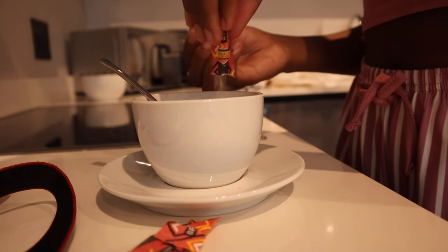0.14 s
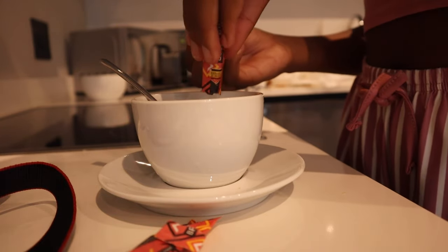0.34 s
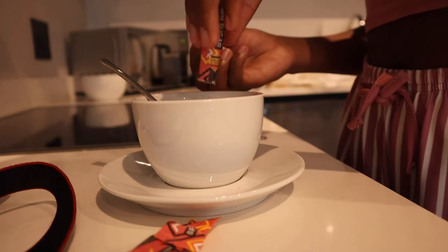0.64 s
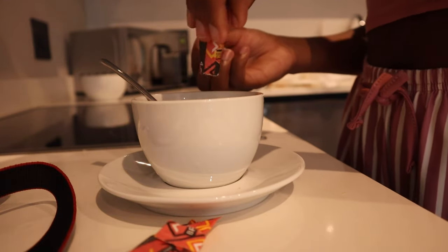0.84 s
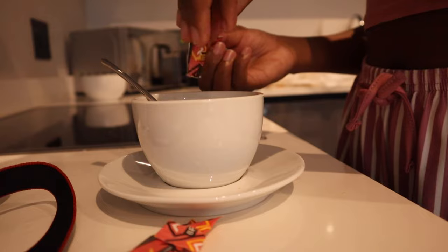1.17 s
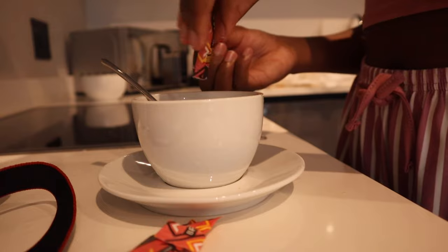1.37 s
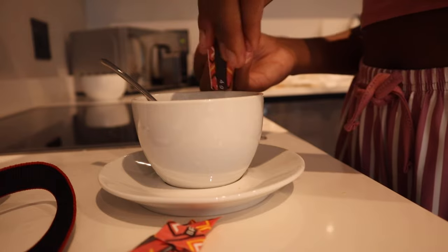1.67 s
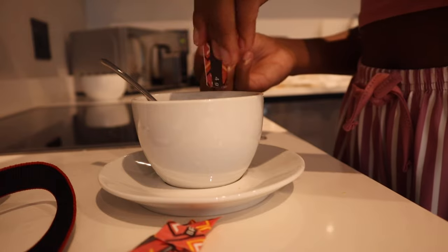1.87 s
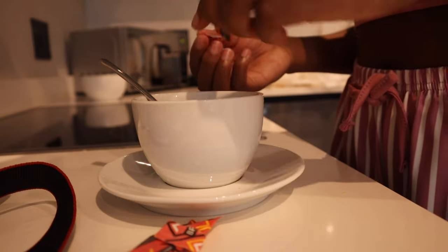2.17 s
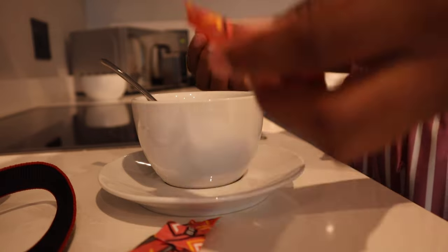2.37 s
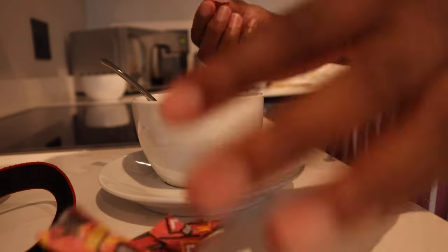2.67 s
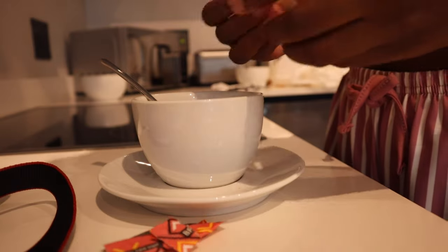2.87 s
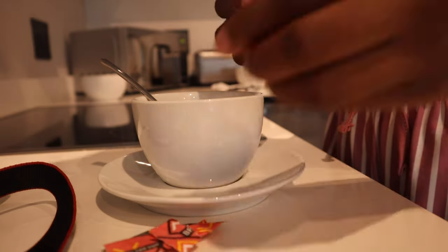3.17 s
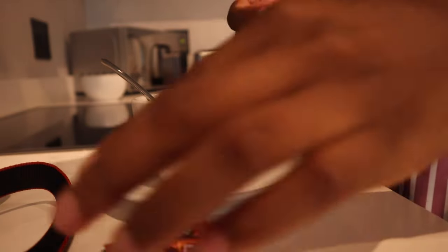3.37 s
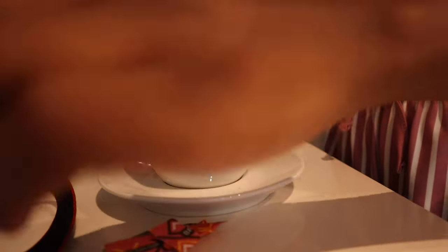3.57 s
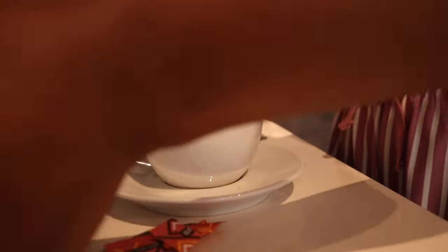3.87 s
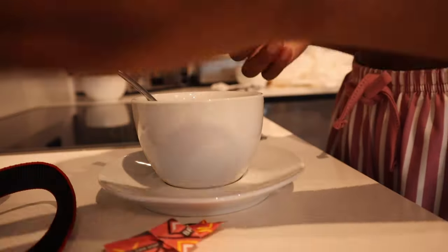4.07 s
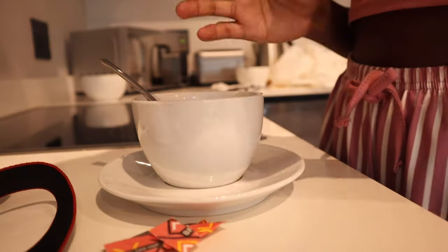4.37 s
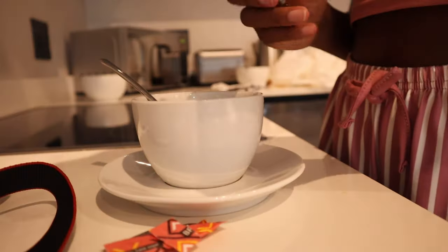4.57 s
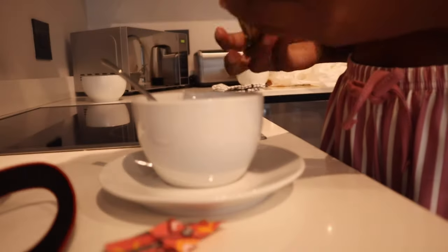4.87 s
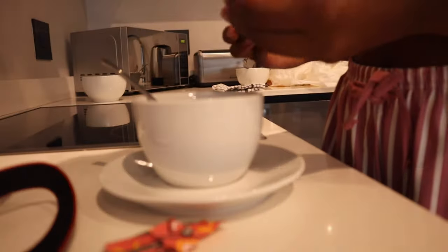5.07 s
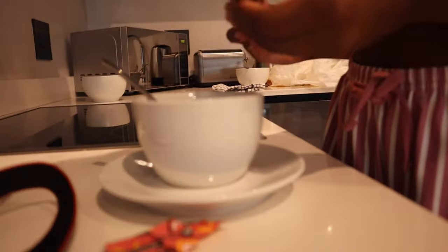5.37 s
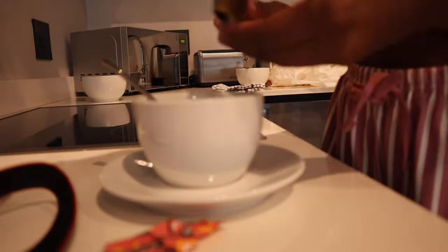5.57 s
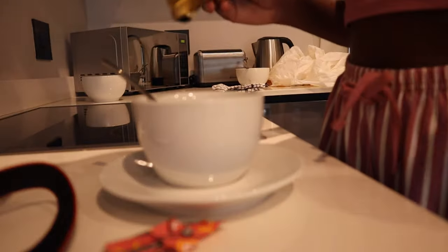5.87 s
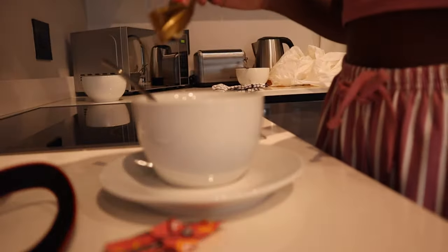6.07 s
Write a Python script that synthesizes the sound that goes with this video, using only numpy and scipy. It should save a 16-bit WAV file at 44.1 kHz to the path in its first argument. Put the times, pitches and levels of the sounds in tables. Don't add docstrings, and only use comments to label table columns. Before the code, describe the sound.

Very close stereo microphone in a small hard kitchen. Fingers squeeze a little plastic sachet over a ceramic cup with bright snaps and hissing powder; it is put down with soft knocks. A quieter reach follows, then another wrapper crackles, tears in a dense burst and crumples, leaving faint appliance hum and low rumble.

```python
import sys
import numpy as np
from scipy import signal
from scipy.io import wavfile
from scipy.ndimage import uniform_filter1d

SR = 44100
rng = np.random.default_rng(int(sys.argv[2]) if len(sys.argv) > 2 else 0)


def natural_amplitude(level_db):
    exponent = np.asarray(level_db, float) / 20
    return 10 ** exponent


def unload_wav(signal):
    wavfile.write(
        sys.argv[1],
        SR,
        np.round(np.clip(np.atleast_2d(signal).T, -1, 1) * 32767).astype(np.int16),
    )


N = 274737

# start_s, left_lag (samples by which the left side hears later), left_minus_right_db
HANDS = [
    (0, 2.5, -5),
    (.6, -1, -2.5),
    (2.9, -2, 0),
    (3.2, 6.5, 1.5),
    (4.2, 6, 3),
    (4.35, 0, 0.7),
    (5.0, 2.5, -2),
    (5.3, -2.5, -0.5),
    (6.23, 3.5, -6),
]


def rms_one(x):
    return x / np.sqrt(np.mean(x ** 2) + 1e-20)


def at_hz(points, hz):
    table_hz, value = np.transpose(points)
    return np.interp(np.log(hz), np.log(table_hz), value)


def band(x, low_hz, high_hz):
    sos = signal.butter(2, [low_hz, min(high_hz, .45 * SR)], "band", fs=SR, output="sos")
    return signal.sosfilt(sos, x + 1e-18)


def resonance(x, hz, width_hz):
    r = np.exp(-np.pi * width_hz / SR)
    feed = np.array([1, 0, -1]) * (1 - r * r) / 2
    return signal.lfilter(feed, [1, -2 * r * np.cos(2 * np.pi * hz / SR), r * r], x + 1e-18)


def drift(rate):
    knots = rng.standard_normal(2000)
    return np.interp(np.arange(N) * 2 * rate / SR, np.arange(2000), knots)


def coloured(mid, side, spectrum, patchy_db, skip=0):
    # pitch_hz, left_right_likeness (1 same, -1 opposite)
    likeness = [(30, 1), (80, 0.94), (160, 0.91), (320, 0.34), (700, -0.2), (2000, -0.62), (12000, -0.52)]
    out = 0
    edges = 22 * 2 ** np.arange(0, 10, .5)
    for k, (low, high) in enumerate(zip(edges, edges[1:])):
        hz = np.sqrt(low * high)
        alike = np.clip(at_hz(likeness, hz), -1, 1)
        gain = natural_amplitude(at_hz(spectrum, hz) + patchy_db * drift(11))
        if k < skip:
            continue
        m, s = band(np.array([mid[k % 2], side[k % 2]]), low, high)
        out = out + gain * (np.sqrt(1 + alike) * m + np.sqrt(1 - alike) * s * [[1], [-1]])
    return rms_one(out)


def hand_pan_db(at_s):
    start_s, _, pan_db = np.transpose(HANDS)
    return np.interp(at_s, start_s, pan_db)


def place(at_s, shapes):
    out = np.zeros((2, N + 8000))
    start_s, left_lag, _ = np.transpose(HANDS)
    lag = np.interp(at_s, start_s, left_lag)
    for s, late, shape in zip(at_s, lag, shapes):
        for ear, shift in enumerate((late / 2, -late / 2)):
            start = int(round(s * SR + shift))
            out[ear, start:start + shape.shape[1]] += shape[ear]
    return out[:, :N]


def background():
    # pitch_hz, width_hz, level_db
    hum_peaks = [(120.5, 13, -54.5), (169.1, 9.2, -60)]
    # pitch_hz, level_db (per Hz)
    air_colour = [(20, -0.5), (32, -18.5), (55, -3.5), (91, -8.5), (147, -5), (300, -9.5), (800, -16),
                  (1400, -18), (4850, -29.5), (8000, -52.5), (10500, -39.5), (14000, -40)]
    white = rng.standard_normal((5, N))
    hum = sum(natural_amplitude(db) * rms_one(resonance(resonance(white[4], f, w), f, w)) for f, w, db in hum_peaks)
    motor_hz, wander_hz, motor_db = 39.5, 1.2, -49.5
    turns = np.cumsum(motor_hz + wander_hz * drift(1.295)) / SR
    motor = natural_amplitude(motor_db + 1.9 * drift(2.4)) * np.sin(2 * np.pi * turns)
    air = natural_amplitude(-45.5) * coloured(white[:2], white[2:4], air_colour, patchy_db=-0.5)
    return air + hum + motor


def scattered(length, spread):
    x = np.eye(1, length)[0]
    for lag in rng.integers(9, 70, 3):
        b = np.zeros(lag + 1)
        b[0], b[-1] = -spread, 1
        x = signal.lfilter(b, b[::-1], x)
    return x


def kitchen(x, tail_db):
    # pitch_hz, fade_s
    room_fade = [(400, 0.53), (1500, 0.55), (4000, 0.46), (8000, 0.43), (14000, 0.39)]
    # delay_s, left_db, right_db
    surfaces = [(.0013, -4, -8), (.0024, -16.5, -24), (.0045, -17, -22.5), (.0070, -9, -19),
                (0.01, -18.5, -11.5), (0.013, -14.5, -16), (0.018, -17.5, -22.5)]
    t = np.arange(SR // 2) / SR
    white = rng.standard_normal((2, len(t)))
    edges = 250 * 2. ** np.arange(7)
    tail = 0
    for low, high in zip(edges, edges[1:]):
        fade_s = at_hz(room_fade, np.sqrt(low * high))
        tail = tail + band(white, low, high) * natural_amplitude(-60 * t / fade_s)
    response = natural_amplitude(tail_db) * tail * (1 - np.exp(-t / 0.0075))
    for delay_s, *ears_db in surfaces:
        start = int(delay_s * SR)
        for ear, db in enumerate(ears_db):
            response[ear, start:start + 800] += natural_amplitude(db) * scattered(length=800, spread=0.38)
    return signal.fftconvolve(x, band(response, 150, 7500), axes=1)[:, :N]


def knocks():
    # start_s, peak_db, pitch_hz, fade_s (to fall by 60 dB)
    blows = [(.962, -20.5, 610, 0.026), (2.667, -25, 850, 0.015), (2.668, -23, 343, 0.016),
             (2.691, -17.5, 750, 0.014), (2.702, -25, 520, 0.029), (2.787, -25, 720, 0.02),
             (2.8, -23.5, 960, 0.025), (2.803, -29, 650, 0.016), (3.431, -28.5, 850, 0.026),
             (3.824, -27, 362, 0.034), (3.889, -33.5, 285, 0.041), (4.102, -21.5, 224, 0.026),
             (4.184, -30, 850, 0.032), (4.18, -28, 512, 0.039), (5.561, -29, 274, 0.054),
             (5.579, -25, 367, 0.02), (3.827, -31, 720, 0.021), (4.107, -29.5, 567, 0.044),
             (4.332, -30, 513, 0.021), (4.376, -29, 514, 0.022), (4.439, -34, 485, 0.031),
             (4.62, -26.5, 486, 0.02), (5.581, -27, 710, 0.018)]
    s, peak_db, hz, fade_s = np.transpose(blows)[:, :, None, None]
    t = np.arange(6000) / SR
    rough = uniform_filter1d(rng.standard_normal((len(blows), 3, 6000)), size=24, axis=2)
    puff = 2.83 * (rough[:, :1] + 0.78 * rough[:, 1:]) * natural_amplitude(-60 * t / (0.84 * fade_s))
    swing = np.sin(2 * np.pi * hz * t) * natural_amplitude(-60 * t / fade_s)
    onset = 1 - np.exp(-t / 0.0011)
    return band(place(s.ravel(), natural_amplitude(peak_db) * onset * (swing + puff)), 99, 1730)


def rubbing():
    # start_s, level_db, brightness_db
    restlessness = [(0, -42.5, 7), (.32, -42.5, 5), (.38, -51, 1), (.7, -59, -3), (.9, -47, 4.5),
                    (2.08, -46, 2), (2.2, -51, 3), (2.65, -57, 6.5), (3.0, -59, 10.5), (3.5, -56.5, 8.5),
                    (3.8, -57.5, -5.5), (4.5, -44, 17.5), (4.75, -43, -27), (5.2, -44, -4), (5.35, -51, 2),
                    (6.23, -55, 8.5)]
    # middle_s, half_length_s, level_db
    slides = [(0.084, 0.034, -31.5), (0.13, 0.029, -34), (0.182, 0.04, -30.5), (0.2, 0.018, -39),
              (0.308, 0.0095, -35.5), (3.05, 0.04, -57.5), (3.2, 0.03, -63), (3.44, 0.011, -50.5),
              (2.6, 0.028, -47.5), (0.94, 0.036, -49.5), (0.279, 0.023, -29), (0.512, 0.041, -49.5),
              (2.3, 0.044, -42.5), (2.394, 0.018, -41), (2.508, 0.021, -44.5), (5.575, 0.072, -35.5),
              (2.733, 0.033, -37), (2.796, 0.014, -42.5), (5.484, 0.018, -34.5)]
    t = np.arange(N) / SR
    start_s, levels, brights = np.transpose(restlessness)
    power = natural_amplitude(2 * np.interp(t, start_s, levels))
    power = power + sum(natural_amplitude(2 * db) * np.exp(-((t - s) / half) ** 2) for s, half, db in slides)
    return 10 * np.log10(power), np.interp(t, start_s, brights)


def rustle():
    # pitch_hz, level_db (per Hz)
    powder = [(400, -23), (800, -11), (1600, -21), (2400, 1), (3500, -4.5), (6000, -8), (10800, -1.5),
              (13000, -3), (15000, -30)]
    # pitch_hz, width_hz, level_db
    sachet = [(1100, 140, 19), (2530, 1000, 1.5), (4250, 610, 8)]
    # pitch_hz, width_hz, level_db
    folded = [(1700, 510, 12.5), (3200, 1140, -1)]
    level_db, bright_db = rubbing()
    busy = np.clip(natural_amplitude(level_db + 30.0), .1, 1)
    born = rng.random((4, N)) < 6000 * busy * natural_amplitude(4 * drift(40)) / SR
    size = natural_amplitude(2.8 * np.minimum(rng.exponential(1, (4, N)), 5))
    ticks = born / np.sqrt(busy) * size * rng.choice([-1, 1], (4, N))
    hiss = coloured(ticks[:2], ticks[2:], powder, patchy_db=2.5, skip=7)
    first = np.arange(N) < 2.6 * SR
    hiss = hiss + sum(natural_amplitude(db + 4 * drift(13)) * resonance(hiss * first, f, w) for f, w, db in sachet)
    hiss = hiss + sum(natural_amplitude(db) * resonance(hiss * ~first, f, w) for f, w, db in folded)
    return natural_amplitude(level_db - 8.0) * (hiss + (natural_amplitude(bright_db) - 1) * band(hiss, 3900, 21000))


def pings():
    # start_s, peak_db, pitch_hz, fade_s (to fall by 60 dB)
    patches = [(.0542, -6, 5880, 0.0054), (.068, -17, 6540, .008), (.0894, -20.5, 6830, 0.0065),
               (.9628, -15.5, 2390, 0.022), (1.0422, -14, 2930, 0.015), (1.044, -24, 1460, 0.022),
               (1.0615, -23, 1460, 0.039), (1.042, -6, 6140, 0.0091), (1.0612, -10, 5670, 0.0087),
               (1.211, -21, 2460, .02), (1.475, -11.5, 2720, 0.014), (1.6105, -14.5, 2780, .012),
               (1.689, -19, 1377, 0.029), (1.689, -8, 4530, .01), (1.7018, -10.5, 3270, 0.018),
               (1.7115, -27, 6700, .01), (1.857, -6, 6130, 0.0071), (2.692, -18, 1400, 0.017),
               (2.693, -7, 2820, 0.01), (2.874, -25.5, 867, 0.023), (2.921, -24, 890, 0.022),
               (4.165, -26, 1720, .025), (4.2135, -27.5, 1660, .025), (2.163, -11, 8760, 0.012),
               (4.8818, -10.5, 4520, 0.011), (4.196, -26, 2510, 0.014), (4.2934, -15, 7100, 0.012),
               (4.295, -18.5, 2050, 0.015), (4.332, -6.5, 2350, 0.01), (4.332, -5, 6400, 0.0055),
               (4.3753, -4, 5740, 0.0071), (4.3753, -5.5, 4000, 0.0058), (4.4356, -8, 6250, 0.01),
               (4.436, -10.5, 2070, 0.013), (4.4406, -14, 2320, .01), (4.4406, -9, 7530, 0.0058),
               (4.62, -8, 3440, 0.0076), (4.62, -16, 6500, .008), (4.846, -15.5, 2970, 0.022),
               (4.847, -21, 1660, 0.034), (4.846, -19, 6250, 0.0061), (4.8811, -24, 1780, 0.014),
               (4.8811, -15, 7400, .008), (4.946, -16, 7400, .008), (4.952, -11.5, 4520, 0.011),
               (4.952, -11.5, 6470, .008)]
    s, peak_db, hz, fade_s = np.transpose(patches)[:, :, None, None]
    t = np.arange(2000) / SR
    halves = np.array([[.5], [-.5]])
    pan_db = hand_pan_db(s) * halves
    skew = halves * 1.1
    fade = natural_amplitude(peak_db + pan_db - 60 * t / fade_s) * (1 - np.exp(-t / 0.00052))
    return place(s.ravel() - .0003, fade * np.sin(2 * np.pi * hz * t + skew))


def creases():
    # start_s, peak_db, pitch_hz (of the film panel), lows_db,
    # highs_db
    squeezing = [(.0416, -19.5, 4440, -3.5, -9), (.049, -12, 3000, -8, -20), (.0522, -20, 3080, -4.5, 0),
                 (.0542, 4.5, 5330, -19.5, -9.5), (.0588, -19, 3000, -0.5, -16),
                 (.0644, -17, 4500, -8, -13.5), (.0681, -17.5, 5000, -6, -11), (.0894, -19, 4700, -7, 0),
                 (.73, -71, 4000, -21, -23), (.7326, 4.5, 4110, -13.5, -4), (.7435, -33, 3800, -10, 1),
                 (.7631, -12, 3900, -13, 2), (.782, -28, 1910, 4.5, -9), (.9128, -15.5, 2670, -13, -6),
                 (.9625, -3, 3920, -5.5, 4.5), (1.012, -17.5, 4230, -4, -4), (1.0422, -3, 4250, -22, -0.5),
                 (1.04, -12, 4400, -8, 6), (1.0535, -15, 4240, -10, 4), (1.0612, -4, 4100, -13, 0),
                 (1.1595, -16, 5760, -10, 3.5), (1.178, -9, 4100, -7.5, -2.5),
                 (1.1995, -2.5, 4270, -15.5, -6.5), (1.238, -32.5, 1900, 19, -6),
                 (1.2496, -8.5, 4340, -23, -10),
                 (1.3983, -6.5, 2830, -14, 1.5), (1.401, -4.5, 4100, -10, -13),
                (1.4268, -14.5, 2470, -13, -5), (1.4761, -3.5, 4340, -16, 0), (1.4918, -14.5, 4430, -6, 3),
                (1.515, -8, 4300, -28, -4.5), (1.611, 0.5, 4360, -10.5, -3.5),
                (1.6216, -16.5, 4220, -8, 13), (1.6238, -9, 4200, -19, 0), (1.689, -1, 2990, -15, -1.5),
                (1.7014, -4, 2530, -10.5, 1), (1.825, -7.5, 4300, -9.5, -5.5), (1.8571, -7, 3960, -13, -8),
                (1.862, -8.5, 2510, -18, 1), (1.9031, -8, 2640, -8.5, -15), (1.923, -10.5, 4200, -13, -0.5),
                (2.0344, -11.5, 2810, -3.5, -9), (2.038, -11.5, 3300, -7.5, -8), (2.052, -17, 4240, -8, 7),
                (2.143, -40, 6500, -23, 16), (2.165, -18, 3800, -16, 14.5)]
    # start_s, peak_db, pitch_hz, lows_db, highs_db
    handling = [(2.504, -30, 3860, -25, -17), (2.509, -29, 3760, -29, -15), (2.515, -26, 4000, -25, -16),
                (2.519, -39, 3900, -25, -15), (2.543, -35, 3980, -20, -11), (2.6678, -17.5, 3030, -1, -2),
                (2.693, 0, 5580, -9.5, -4), (2.7175, -29, 3880, -6, 11), (2.751, -20, 4430, -2, -3),
                (2.7692, -22.5, 5260, -7, -3), (2.792, -21, 2260, -2, -27), (2.805, -13, 2360, -16, -33),
                (2.8747, -9, 2670, -4, -9), (2.921, -25, 3960, 2.5, -6), (3.427, -23.5, 2270, -13, -2),
                (3.43, -17.5, 4100, -1.5, -7), (3.8225, -39.5, 4840, -9, 6.5), (3.89, -21, 5000, -6, -9),
                (3.9481, -9.5, 4520, -15, -10), (3.9985, -27, 6400, -6, -1), (4.073, -12, 6140, -11, -0.5),
                (4.1037, -7, 5240, -30, -4.5), (4.164, -19.5, 3050, 2.5, -33),
                (4.178, -12.5, 2460, -10, -15), (4.1845, -4, 2980, -11.5, -14),
                (4.2134, -11.5, 2350, -5, -12)]
    # start_s, peak_db, pitch_hz, lows_db, highs_db
    tearing = [(4.2935, -7, 2020, -6, 2.5), (4.332, -3.5, 3070, -13.5, -1.5), (4.3538, -5.5, 3800, -13, 1),
               (4.3753, -3, 3960, 0.5, 7), (4.4292, -3.5, 4540, -12, 0), (4.4357, -1.5, 3380, -13, 3.5),
               (4.4408, -2, 5620, -18.5, -3.5), (4.4482, -9, 2350, -3.5, 2.5), (4.595, -12.5, 5470, -27, 3),
               (4.6195, -6, 2010, -7, 4.5), (4.6371, 2.5, 5300, -21, -0.5), (4.6408, -0.5, 4340, -7.5, -1),
               (4.685, -8.5, 2220, -5, -10.5), (4.7379, -16, 4600, -15, -6), (4.846, -3.5, 3090, -5, 4),
               (4.8808, 0.5, 4300, -4.5, 1.5), (4.895, -5.5, 2470, -10, -33), (4.945, -11, 2480, -18, -4),
               (4.952, -2.5, 3000, -32, -7)]
    # start_s, peak_db, pitch_hz, lows_db, highs_db
    crumpling = [(5.0346, -14.5, 2660, -6, -9), (5.039, -20, 1900, -7, -9), (5.0555, -10.5, 2360, -9, -28),
                 (5.0588, -13, 1910, -14, 2), (5.0623, -12, 1700, 0, -34), (5.068, -14, 4450, -4, 10.5),
                 (5.0835, -23.5, 1700, 9, -21), (5.0858, -17, 1930, 3, -14), (5.089, -18, 2000, 1.5, -6),
                 (5.0925, -22, 1870, 5, -2.5), (5.141, -21, 2050, -7, -14.5),
                 (5.2035, -23, 2090, -0.5, -31), (5.4159, -12, 3850, -9, 0), (5.4236, -4, 3000, -16, 3.5),
                 (5.426, -12, 2200, -11, 2), (5.4287, -9.5, 1760, -7.5, -4), (5.4345, -16, 1700, -15, -13),
                 (5.432, -6.5, 2600, -6.5, -16), (5.4551, -15, 3570, -9, -9), (5.4581, -12, 2030, -1, -21),
                 (5.477, -6.5, 2070, -41, -4), (5.4815, -8.5, 2560, -5, -9), (5.5435, -16, 4010, -0.5, -24),
                 (5.5539, -18.5, 1900, -6, 0.5), (5.5736, -23.5, 1800, 4, -19), (5.5779, -11, 3200, -4, 6),
                 (5.5816, -15.5, 2170, 0, -6), (5.588, -14, 1840, -8, -3.5), (5.589, -20, 1990, -12, -9),
                 (5.7863, -21, 2810, 0, 3.5)]
    # start_s, peak_db, pitch_hz
    faint = [(0.034, -25, 2960), (0.1743, -20.5, 4170), (0.195, -23, 4000), (0.2142, -22.5, 3780),
             (0.257, -25, 4200), (.297, -23, 2630), (.1466, -29, 4190), (0.2776, -25, 4170),
             (.289, -25, 2900), (.076, -19, 5050), (0.106, -26, 6000), (2.844, -35, 2290), (2.7, -30, 3000),
             (2.711, -27, 5000), (2.736, -33, 4600), (2.93, -31, 1950), (4.856, -27, 3100),
             (4.915, -22, 2300), (4.957, -17, 3400), (4.9628, -21, 2980), (4.386, -31, 4500),
             (1.699, -20, 3000), (0.334, -32, 5000), (0.4353, -33, 3660), (.468, -34.5, 5800),
             (0.487, -29, 4140), (0.4969, -27.5, 5600), (0.513, -34, 6000), (.527, -30.5, 4060),
             (0.843, -27.5, 4070), (1.1523, -24, 4160), (1.392, -19, 2740), (1.842, -17.5, 2520),
             (2.024, -25, 2670), (2.0755, -19, 2640), (2.4432, -30.5, 3850), (2.456, -32, 5350),
             (2.4932, -39, 3900), (2.427, -37, 6100), (2.461, -36, 2500), (2.678, -19, 4080),
             (2.706, -25, 3800), (2.783, -24.5, 3600), (2.8918, -27, 3700), (3.1082, -34.5, 3550),
             (3.2846, -34, 3730), (3.3582, -32, 5390), (3.883, -26.5, 4180), (3.9017, -27.5, 2250),
             (4.017, -32, 4830), (4.605, -44, 4000), (5.215, -35, 3880), (5.34, -36, 2600),
             (6.098, -35, 1900)]
    ticks = [(*row, -10, 1) for row in faint]
    rows = np.vstack([squeezing, handling, tearing, crumpling, ticks])
    scatter_db = 2 * rng.standard_normal(len(rows))
    return np.column_stack([rows, hand_pan_db(rows[:, 0]) + scatter_db])


def snaps():
    # pitch_hz, width_hz, level_db
    cup_air = [(1172, 92, -3), (1400, 320, -8.5), (850, 720, -10)]
    # pitch_hz, width_hz, level_db
    hand_air = [(1434, 380, -11.5), (1820, 190, -9.5), (740, 500, -18)]
    s, peak_db, hz, low_db, high_db, pan_db = creases().T[:, :, None, None]
    t = np.arange(400) / SR
    draw = rng.standard_normal((len(s), 9, 400))
    side = natural_amplitude(pan_db * np.array([[.5], [-.5]]))

    def crack(first, alike, fall_s):
        noise = np.sqrt(alike) * draw[:, first:first + 1] + np.sqrt(1 - alike) * draw[:, first + 1:first + 3]
        burst = noise * (1 - np.exp(-t / 0.000053)) * np.exp(-t / fall_s)
        burst[:, :, 4] += 4.2
        return side * burst / np.sqrt(np.sum(burst ** 2, axis=2, keepdims=True))

    at = s.ravel() - .0003
    swing = np.sin(2 * np.pi * hz * t + 0.97 * draw[:, :2, :1])
    panel = side * swing * (1 - np.exp(-t / 0.00048)) * np.exp(-t / 0.00069)
    ring = place(at, natural_amplitude(peak_db + 2.0) * panel)
    middle = place(at, natural_amplitude(peak_db + 13.0 + 0.25 * high_db) * crack(0, 0.45, 0.0013))
    top = place(at, natural_amplitude(peak_db + high_db + 12.5) * crack(3, 0.19, 0.00067))

    push = natural_amplitude(peak_db + low_db + 30.0) * (side * (t == t[4]) * 0.51 + 0.46 * crack(6, 1.0, 0.002))
    over_cup = s < 2.3
    low = 0
    for air, here in ((cup_air, over_cup), (hand_air, ~over_cup)):
        for k, (f, w, db) in enumerate(air):
            share = natural_amplitude(db + 3.5 * draw[:, k:k + 1, -1:])
            low = low + (-1) ** k * resonance(place(at, push * here * share), f, w)
    cracks = band(middle, 2170, 5770) + band(top, 6140, 11400) + band(low, 410, 9000)
    return cracks, ring + pings()


def scene():
    cracks, ring = snaps()
    near = cracks + knocks() + rustle()
    room = kitchen(near + natural_amplitude(-7) * ring, tail_db=-34.5)
    return near + ring + room + background()


def thin_treble(x):
    safe_below_hz = np.array([4800, 11700])[:, None, None]
    depth_db, scatter_db, recovery_db_per_s, foresight_s = 30, 5, 140, .012
    both = np.array([x[0] + x[1], x[0] - x[1]]) / 2
    hz, t, z = signal.stft(both, SR, nperseg=256, noverlap=192)
    power = uniform_filter1d(np.abs(z) ** 2, size=5, axis=2) + 1e-20

    loud_db = 10 * np.log10(power[0, hz > 2000].sum(axis=0))
    recovery_db = recovery_db_per_s * t
    held_db = np.maximum.accumulate(loud_db + recovery_db) - recovery_db
    held_db = np.maximum(held_db, np.interp(t + foresight_s, t, held_db) - 6)

    strip = np.arange(len(hz)) // 4
    frame = np.arange(len(t)) // 16
    strip_db = 10 * np.log10(np.add.reduceat(power, np.arange(0, len(hz), 4), axis=1))
    luck_db = scatter_db * rng.standard_normal((strip_db.shape[1], len(t)))[:, frame]
    spared_db = np.clip((hz[::4, None] - 11000) / 250, 0, 14) + np.array([0, 2])[:, None, None]
    audible = strip_db > held_db - depth_db - spared_db + luck_db
    keep = audible[:, strip] | (hz[:, None] < safe_below_hz)
    kept = signal.istft(z * keep, SR, nperseg=256, noverlap=192)[1][:, :N]

    lost = signal.stft(both - kept, SR, nperseg=2048)[2]
    lost_power = np.abs(lost) ** 2
    lone = lost_power > natural_amplitude(2 * 6) * uniform_filter1d(lost_power, size=40, axis=1)
    mid, side = kept + signal.istft(lost * lone, SR, nperseg=2048)[1][:, :N]
    return np.array([mid + side, mid - side])


def roll_off(x):
    return signal.sosfilt(signal.butter(12, 17010, fs=SR, output="sos"), x)


def record(dry):
    dull = signal.sosfilt(signal.butter(6, 12500, fs=SR, output="sos"), dry)
    clipped = np.clip(thin_treble(dull), -1, 1)
    full = signal.sosfilt(signal.butter(4, 15500, fs=SR, output="sos"), clipped)
    return roll_off(np.clip(full, -1, 1))


dry = scene()
out = record(dry)
unload_wav(out)
```